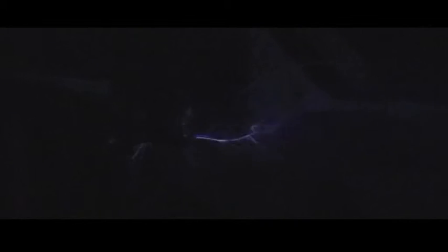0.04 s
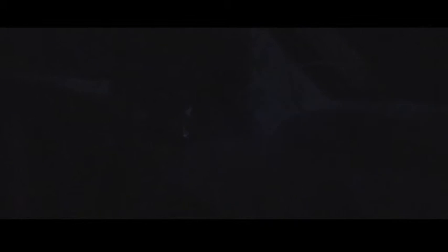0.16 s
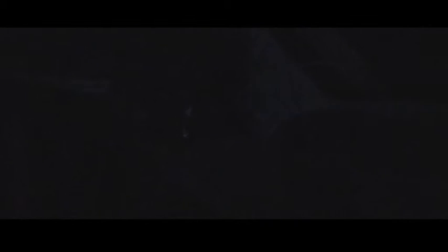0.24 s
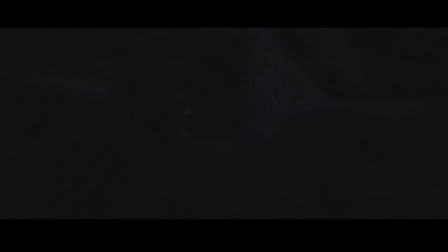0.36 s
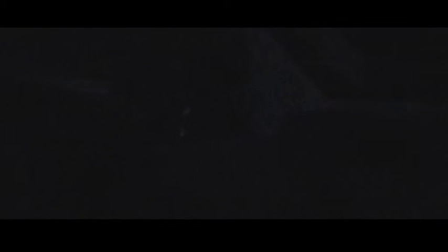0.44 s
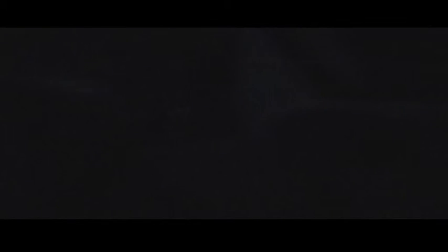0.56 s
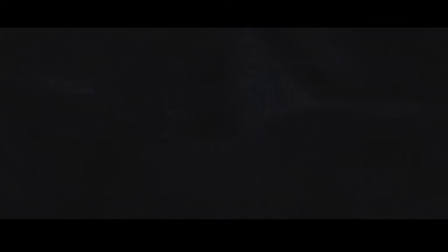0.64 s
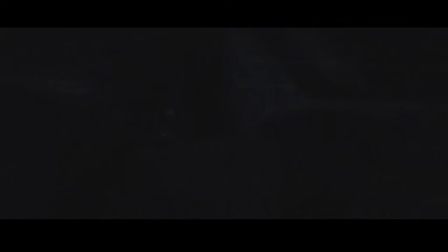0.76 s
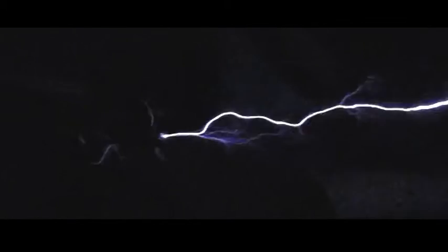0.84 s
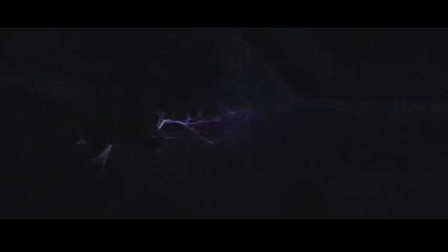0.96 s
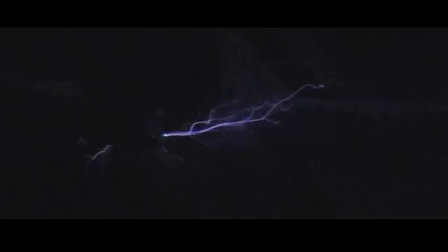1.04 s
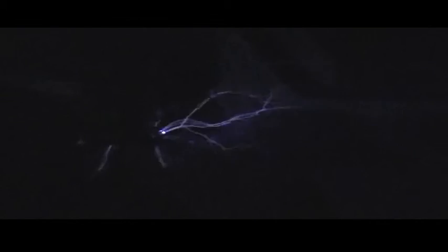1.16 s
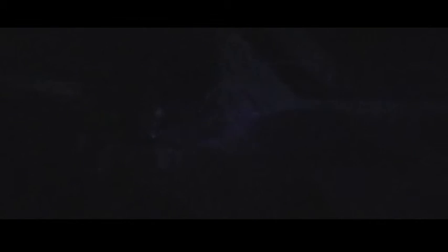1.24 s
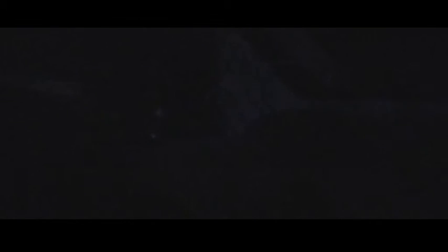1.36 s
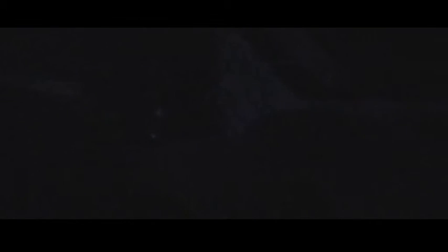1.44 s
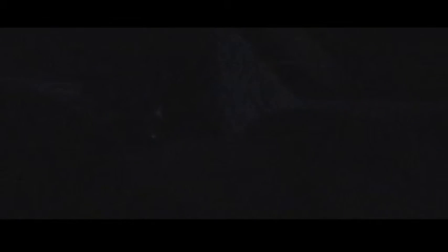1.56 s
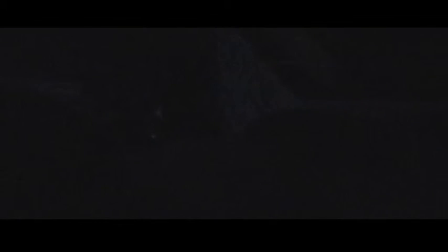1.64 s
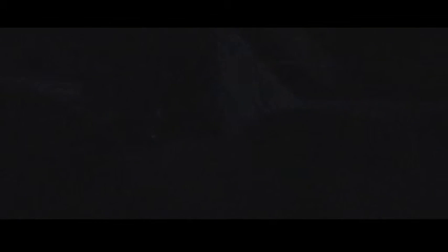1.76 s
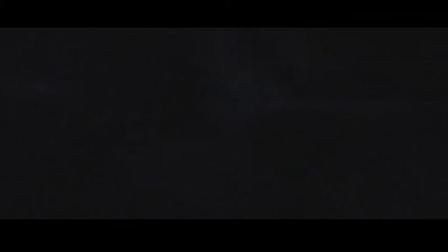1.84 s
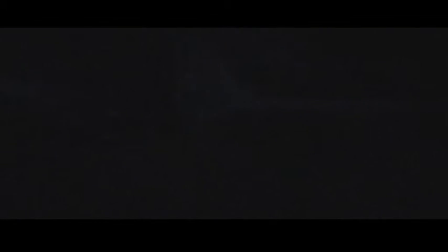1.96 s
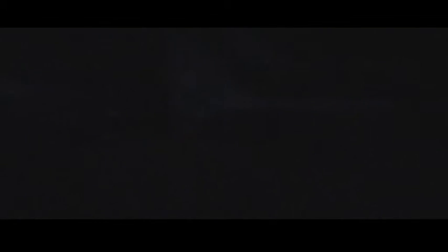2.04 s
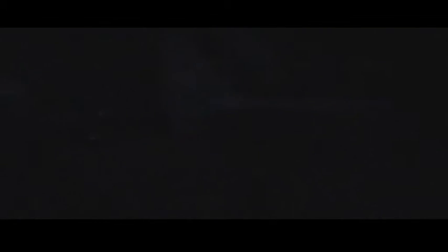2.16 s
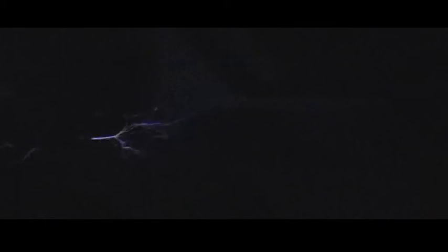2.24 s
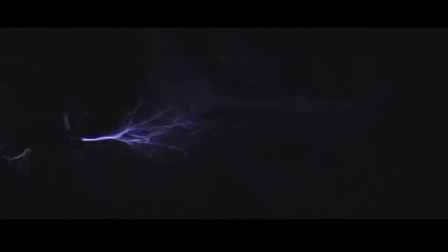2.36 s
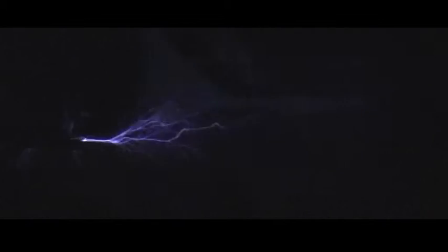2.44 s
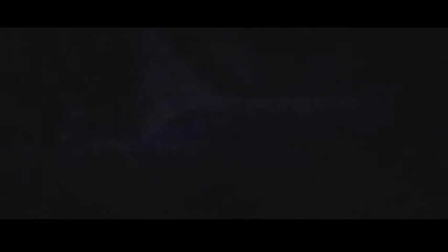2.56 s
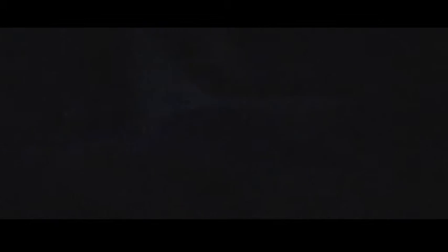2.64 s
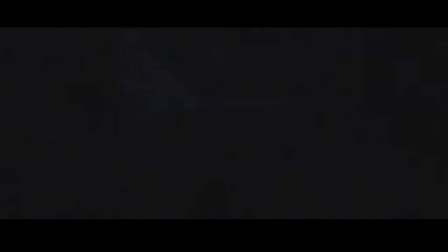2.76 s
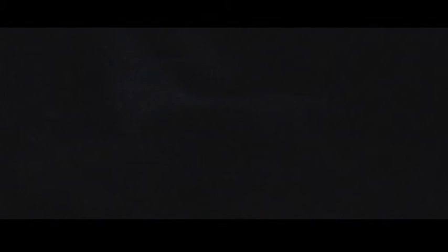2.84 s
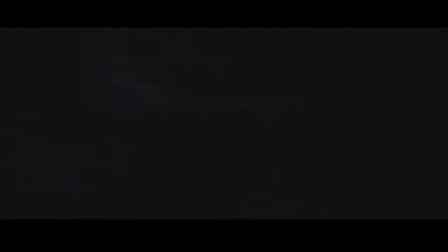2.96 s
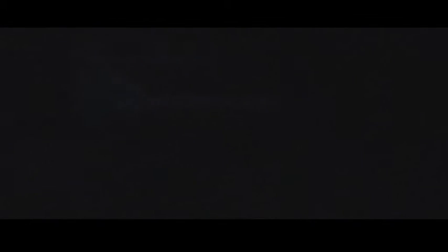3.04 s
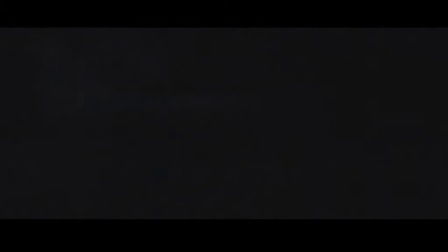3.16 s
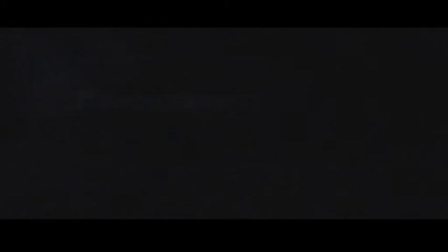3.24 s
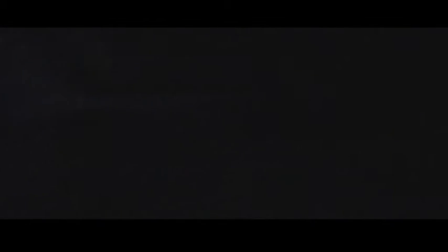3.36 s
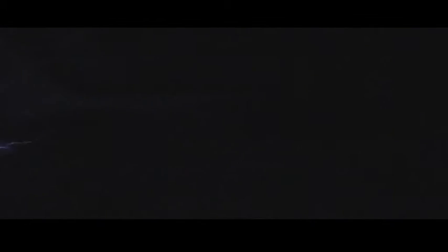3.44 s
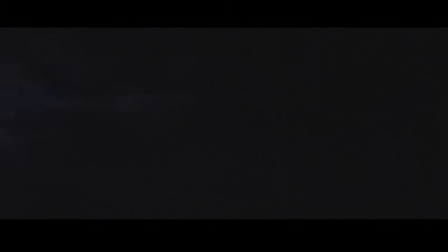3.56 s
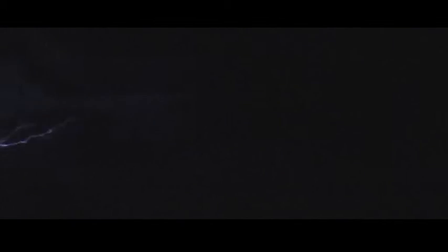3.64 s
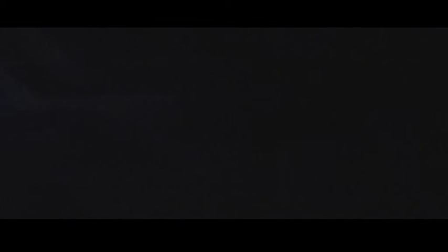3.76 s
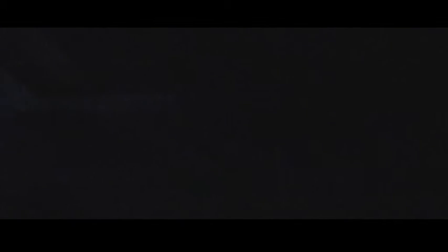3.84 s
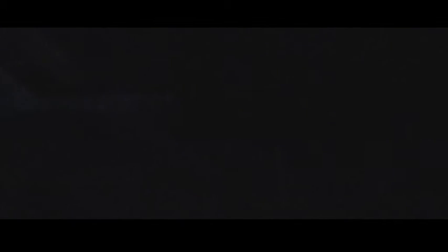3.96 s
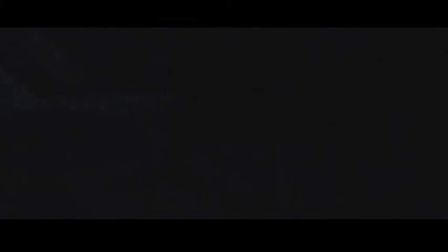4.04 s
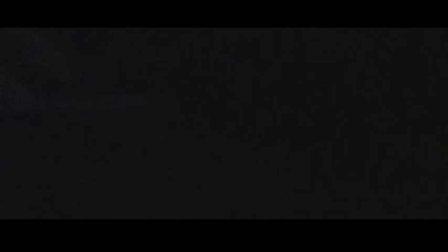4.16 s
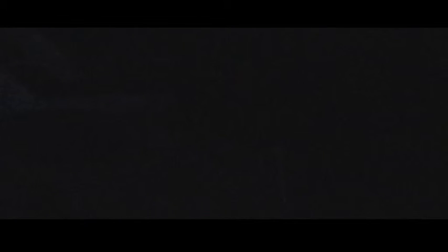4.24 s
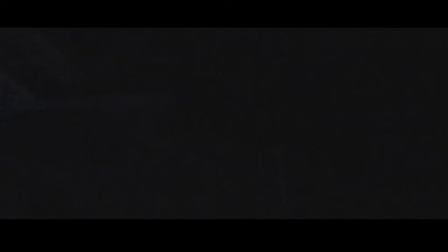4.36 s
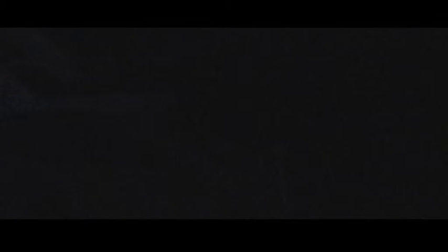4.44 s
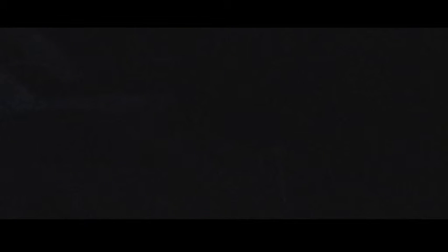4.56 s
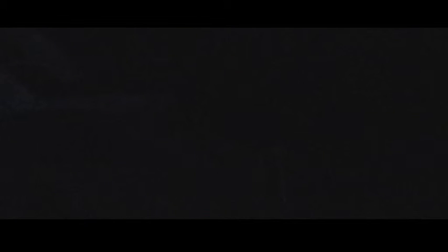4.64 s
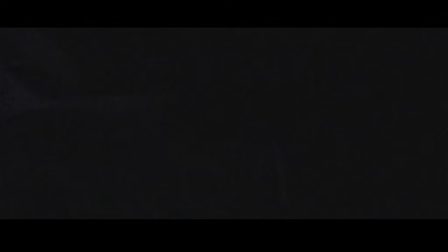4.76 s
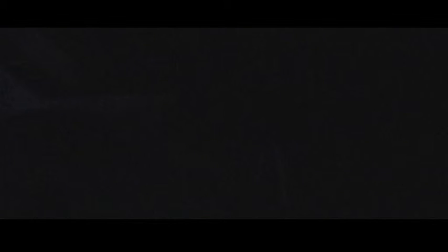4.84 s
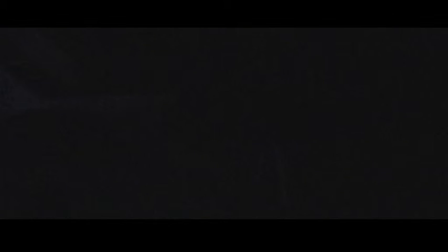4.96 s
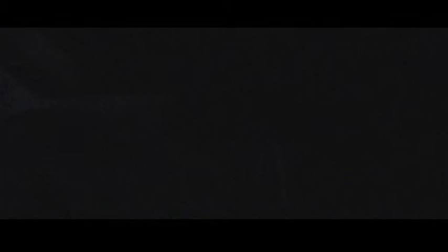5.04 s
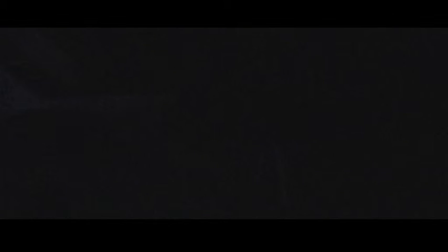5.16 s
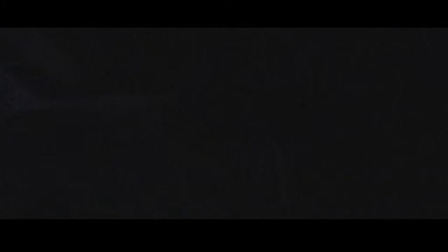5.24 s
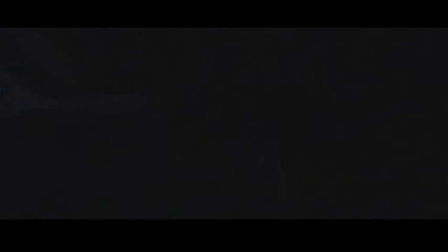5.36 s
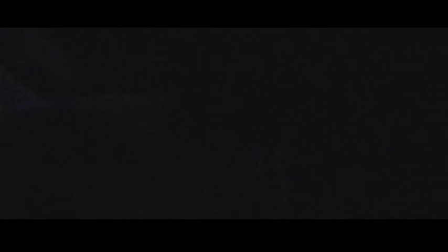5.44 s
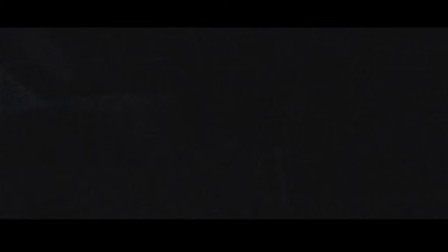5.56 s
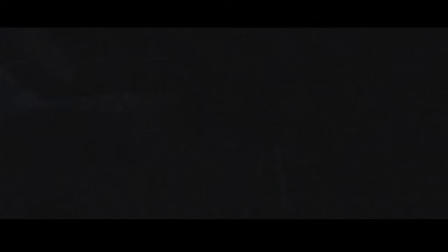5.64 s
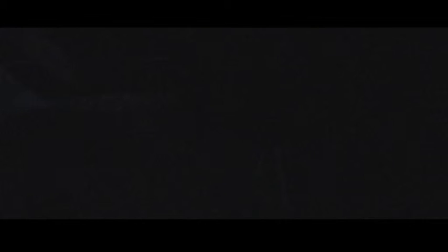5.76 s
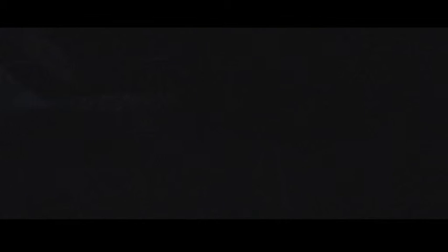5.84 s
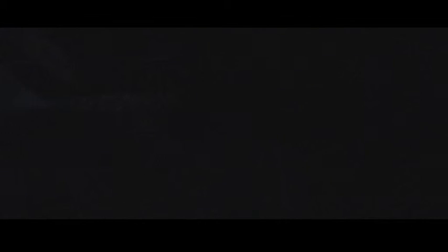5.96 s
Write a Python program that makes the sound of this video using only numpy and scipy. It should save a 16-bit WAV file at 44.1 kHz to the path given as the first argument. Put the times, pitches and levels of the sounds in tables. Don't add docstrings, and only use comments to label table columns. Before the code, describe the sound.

A contactor clacks and a spark coil rasps loudly, stopping and restarting in an echoing workshop, before quiet wooden knocks and a click.

```python
import sys
import numpy as np
from scipy import signal
from scipy.io import wavfile
from scipy.ndimage import uniform_filter1d

SR = 44100
rng = np.random.default_rng(int(sys.argv[2]) if len(sys.argv) > 2 else 0)


def decibels_to_gain(level_db):
    exponent = np.asarray(level_db, float) / 20
    return 10 ** exponent


def unload_audio(sound):
    columns = np.transpose(np.atleast_2d(sound))
    steps = np.round(np.clip(columns, -1, 1) * 32767)
    wavfile.write(sys.argv[1], SR, steps.astype(np.int16))


N = 264585
LEAD = 3 * SR // 10
DUCK_DB = -16.5


def evened(x):
    return x / np.sqrt(np.mean(x ** 2) + 1e-20)


def read(points, hz):
    f, value = np.transpose(points)
    return np.interp(np.log(hz + 1), np.log(f + 1), value)


def add(mix, start_s, sound):
    part = mix[round(start_s * SR):][:len(sound)]
    part += sound[:len(part)]


# frequency in Hz, difference in dB.
PORT_LEAN = [(60, -19.5), (180, -12), (550, -6), (1650, -3.5), (4970, -3.5), (15000, -5)]


def causal(points, lean=0):
    hz = abs(np.fft.fftfreq(4096, 1 / SR))
    log_gain = np.log(decibels_to_gain(np.maximum(read(points, hz), -100)))
    log_energy = np.log(np.mean(np.exp(2 * log_gain)))
    log_gain += np.log(decibels_to_gain(lean * read(PORT_LEAN, hz))) - log_energy / 2
    pulse = np.fft.ifft(np.exp(np.conj(signal.hilbert(log_gain)))).real
    return pulse[:2048] * np.hanning(4096)[2048:]


def dying_noise(t60_s, rise_s):
    t = np.arange(round(.4 * SR)) / SR
    decay = decibels_to_gain(-60 * t / max(t60_s, .002))
    return rng.standard_normal(len(t)) * decay * np.minimum(t / max(rise_s, 1e-4), 1)


# frequency in Hz, density in dB per Hz.
AIR_SPECTRUM = [(25, -42), (60, -21.5), (110, -9.5), (155, -0.5), (200, -14.5), (260, -1.5), (340, -17),
                (470, -11), (620, -19), (830, -13.5), (1650, -21), (3200, -23.5), (5000, -30),
                (16000, -35.5)]
# frequency in Hz, correlation.
AIR_LIKENESS = [(60, 0.92), (180, 1), (550, 0.93), (1650, 0.9), (4970, 0.41), (15000, 0.19)]
# time in seconds, level in dB.
RUMBLE_SWELL = [(0, 1), (.7, -0.5), (1.749, 3), (2.201, -0.5), (3.299, -2), (4.3, -2.5), (4.9, 2),
                (5.3, -3), (6, 1.5)]
# frequency in Hz, level in dB rms.
CAMERA_WHINE = [(5701, -76), (6300, -85), (9900, -78.5), (11698, -88.5), (12301, -89), (14853, -82.5),
                (15149, -90.5), (15299, -85), (15450, -87.5)]


def room_noise():
    frames, hz, t = N // 512 + 5, np.fft.rfftfreq(2048, 1 / SR), np.arange(N) / SR
    a, b, c, d, patches = rng.standard_normal((frames, 1025, 5)).T
    patches = uniform_filter1d(patches, size=16, axis=0)
    patches = evened(uniform_filter1d(patches, size=7, axis=1))
    swell_db = np.interp(np.arange(frames) * 512 / SR, *np.transpose(RUMBLE_SWELL))
    drift_db = swell_db / (1 + (hz[:, None] / 1500) ** 2)
    patch_db = (0.3 + 1.6 / (1 + (hz[:, None] / 1200) ** 2)) * patches

    same = np.clip(read(AIR_LIKENESS, hz), -1, 1)[:, None]
    left = a + 1j * b
    right = same * left + np.sqrt(1 - same ** 2) * (c + 1j * d)
    z = np.array([left, right]) * decibels_to_gain(read(AIR_SPECTRUM, hz)[:, None] + patch_db + drift_db)
    air = decibels_to_gain(-51.5) * evened(signal.istft(z, nperseg=2048, noverlap=1536)[1][:, :N])
    whine = sum(decibels_to_gain(db + 1.0) * np.sin(2 * np.pi * (f * t + rng.random())) for f, db in CAMERA_WHINE)
    return air + whine


# frequency in Hz, t60 in seconds.
WALL_T60 = [(150, .25), (450, 2.3), (1000, 1.26), (2000, 0.92), (3500, 0.78), (6000, 0.62), (10000, 0.39),
            (15000, 0.47)]
# frequency in Hz, level in dB.
WALL_LEVEL = [(150, -38.5), (450, -23), (1000, -13.5), (2000, 1), (3500, 0.5), (6000, 2), (10000, -4.5),
              (15000, -7.5)]
# frequency in Hz, level in dB.
BENCH_ECHO = [(150, -38.5), (600, -30), (1500, -28.5), (3000, -25), (6000, -22.5), (10500, -26),
              (15000, -28.5)]


def workshop(x):
    length, first_echo_samples, turns_hz = 3 * SR // 2, 60, 48.0
    noise = rng.standard_normal((3, 2, length)) * (np.arange(length) > first_echo_samples)
    hz, t, z = signal.stft(noise, SR, nperseg=256)
    z[:, 1] = 0.69 * z[:, 0] + 0.18 * z[:, 1]
    t60_s = np.maximum(read(WALL_T60, hz), .03)[:, None]
    late = decibels_to_gain(read(WALL_LEVEL, hz)[:, None] - 60 * t / t60_s) / np.sqrt(t60_s * 4500)
    early = decibels_to_gain(read(BENCH_ECHO, hz)[:, None] - 60 * t / 0.09)
    tails = signal.istft(z * (late + early), SR, nperseg=256)[1]
    turn = 2 * np.pi * (np.arange(x.shape[1]) / SR * turns_hz + np.arange(3)[:, None, None] / 3)
    shares = x * np.sqrt((1 + np.cos(turn)) / 3)
    return signal.fftconvolve(shares, tails, axes=2).sum(0)[:, :x.shape[1]]


# start in seconds, peak in dB, t60 in seconds, top frequency in Hz.
BENCH_KNOCKS = [
    (4.601, -38.5, 0.49, 2540),
    (4.945, -41, 0.059, 2980),
    (4.97, -43, 0.066, 2200),
    (5.032, -24, 0.24, 1300),
    (5.096, -57.5, 0.17, 1200),
    (5.492, -45, 0.11, 700),
    (5.715, -25.5, 0.27, 2120),
    (5.922, -32.5, 0.14, 6000),
    (5.943, -25.5, 0.037, 2980),
]
# frequency in Hz, width in Hz, gain in dB.
BENCH_MODES = [(249, 50, -1.5), (469, 110, -1.5), (754, 123, 2), (970, 60, -6), (1320, 140, -6.5),
               (1630, 56, -11), (2230, 77, -16)]
# start in seconds, peak in dB, t60 in seconds.
BUTTON_TICKS = [
    (5.106, -57, .02),
    (5.926, -48, 0.0072),
    (5.9415, -31, 0.0055),
]
# frequency in Hz, density in dB per Hz.
TICK_SPECTRUM = [(1200, -37), (2000, -13), (4650, 1), (6900, 0), (11500, -5), (13300, -24), (14800, -1),
                 (16000, -12)]


def knocks():
    out = np.zeros(N)
    for start_s, peak_db, t60_s, top_hz in BENCH_KNOCKS:
        blow = dying_noise(t60_s, 0.00018) + 1.93 * dying_noise(0.019, 0.00018)
        push = signal.lfilter(*signal.butter(4, min(top_hz, 15000), fs=SR), blow)
        body = 0
        for hz, width_hz, gain_db in BENCH_MODES:
            peak = signal.iirpeak(hz, hz / max(width_hz, 30), SR)
            body = body + decibels_to_gain(gain_db) * signal.lfilter(*peak, push)
        add(out, start_s, decibels_to_gain(peak_db) * body / abs(body).max())
    for start_s, peak_db, t60_s in BUTTON_TICKS:
        tick = signal.fftconvolve(dying_noise(t60_s, 0.00029), causal(TICK_SPECTRUM))
        add(out, start_s, decibels_to_gain(peak_db + 9.0) * tick)
    return out


# start in seconds, peak in dB, housing ring in dB, rise in seconds,
# t60 of the rattle in seconds.
CONTACTOR_BLOWS = [
    (0.167, -31, 3.5, 0.0016, 0.2),
    (0.788, -10.5, -4, 0.0041, 0.083),
    (1.591, -12.5, -7, .003, 0.19),
    (2.187, -6.5, -4.5, 0.0056, 0.061),
    (2.665, -25, -4, 0.0025, 0.26),
    (3.398, -7.5, -5, .004, 0.042),
    (3.881, -18.5, -8, .0015, 0.12),
    (3.912, -33, 7.5, 0.0037, 0.3),
]
# frequency in Hz, density in dB per Hz.
CLACK_SPECTRUM = [(100, -51), (250, -36), (500, -30.5), (1300, -3), (2000, -10), (2900, -3.5), (5000, -9.5),
                  (8000, -5.5), (12000, -10.5), (16000, -17.5)]
# frequency in Hz, level in dB, t60 in seconds.
HOUSING_MODES = [(356, -7.5, 0.049), (397, -10, 0.022), (468, 3.5, 0.08), (501, -5.5, 0.09),
                 (1320, -13.5, 0.03), (1687, -15, 0.023), (2840, -0.5, 0.019), (3200, -13, 0.02)]


def contactor():
    out, blows, t = np.zeros(N), np.zeros(N), np.arange(4000) / SR
    modes = np.array([decibels_to_gain(db - 60 * t / t60_s) * np.sin(2 * np.pi * hz * t) for hz, db, t60_s in HOUSING_MODES])
    heavy = np.transpose(HOUSING_MODES)[0] < 600
    heavy_ring, bright_ring = modes[heavy].sum(0), modes[~heavy].sum(0)
    snap = causal(CLACK_SPECTRUM)
    for start_s, db, ring_db, rise_s, t60_s in CONTACTOR_BLOWS:
        rattle = dying_noise(t60_s, rise_s)
        rattle *= np.minimum(np.arange(len(rattle)) / SR / max(rise_s, 1e-4), 1)
        seat = np.r_[6., .7 * rattle]
        thud = signal.fftconvolve(seat, heavy_ring)
        ping = signal.fftconvolve(seat, bright_ring)
        add(out, start_s, decibels_to_gain(db - 1) * signal.fftconvolve(rattle, snap))
        add(out, start_s + 1.6 * rise_s, decibels_to_gain(db + ring_db - 26.5) * thud)
        add(out, start_s + .45 * rise_s, decibels_to_gain(db + ring_db / 2 - 20) * ping)
        add(blows, start_s + rise_s, decibels_to_gain(db + 14.5) * snap)
    return signal.sosfilt(signal.butter(2, 200, "high", fs=SR, output="sos"), out), blows


def streamer(heat, length):
    t, push_s = np.arange(120) / SR, .00006
    back_s = 0.00024 + 0.00055 * length
    push = 0.28 * np.exp(-((t - 2 * push_s) / push_s) ** 2)
    suction = 0.56 * .25 * np.exp(-((t - back_s) / .0001) ** 2)
    shared, own = rng.standard_normal(len(t) + 1), rng.standard_normal((2, len(t) + 1))
    branches = signal.lfilter([1, -.8], 1, 0.38 * shared + 0.2 * own)[:, 1:]
    return heat * push - heat * suction + branches * np.exp(-t / 0.00052)


# first spark in seconds, last spark in seconds.
COIL_BURSTS = [
    (-.25, .043),
    (.8145, 1.243),
    (2.2142, 2.526),
    (3.4245, 3.689),
]
# level at switch-on in dB, fading as the gap warms in dB per second,
# switch-on row against the rest in dB.
BURST_STRENGTH = [
    (-16, -16, -8.5),
    (-16, -8.5, 1.5),
    (-15, -13, -3),
    (-15, -18.5, -4.5),
]
# start in seconds, end in seconds.
GAP_STALLS = [
    (1.094, 1.115),
    (3.506, 3.526),
]
FIRING_SAG_DB = [3, 1.5, -1, -3]


def sparks():
    half_wave_s, fire_at_s = .01, .0067
    wait_s = np.array([.0002, .0016, .0018, .0015])
    wait_spread_s = np.array([.002, .0017, .001, .001])
    falter_s, falter_db = 0.021, -2.5
    inrush_fall_db_per_s, inrush_push = 700, 0.66

    starts_s = np.arange(-26, N // 441) * half_wave_s + fire_at_s
    draw = rng.random((len(starts_s), 2, 4))
    waits_s = wait_s + wait_spread_s * draw[:, 0]
    s = (starts_s[:, None] + np.cumsum(waits_s, axis=1)).ravel()
    fires = (draw[:, 1] < [1, .9, .5, .1]).ravel()
    sag_db = np.tile(FIRING_SAG_DB, len(starts_s)) * 1.
    for a, b in GAP_STALLS:
        fires &= (s < a) | (s > b)
        sag_db += falter_db * np.clip(1 - (a - s) / falter_s, 0, 1) * (s < a)

    out = np.zeros((2, LEAD + N))
    for (first, last), (start_db, fade_db_per_s, boost_db) in zip(COIL_BURSTS, BURST_STRENGTH):
        inrush = first + np.arange(9) * 0.0011 + 0.00091 * np.r_[0, rng.random(8)]
        inrush_db = boost_db - inrush_fall_db_per_s * (inrush - first)
        running = fires & (s > first + .011) & (s < last)
        times = np.r_[s[running], inrush]
        level_db = start_db + fade_db_per_s * (times - first) + np.r_[sag_db[running], inrush_db] + 11.5
        heats = np.r_[np.ones(running.sum()), inrush_push * np.ones(len(inrush))]
        for at, db, heat in zip(times, level_db, heats):
            size, side = rng.standard_normal(2)
            shock = streamer(heat, rng.random())
            for port, sign in enumerate((1, -1)):
                delay_s = sign * (.000007 * side - .000006)
                port_db = db - DUCK_DB + 2.24 * size + 0.91 * sign * side
                add(out[port], at + LEAD / SR + delay_s, decibels_to_gain(port_db) * shock[port])
    return out


def ducking():
    react_s, fall_s, hold_s, recover_s = .0075, 0.0011, .32, .235
    corners = []
    for first, last in COIL_BURSTS:
        corners += [(first + react_s, 0), (first + react_s + fall_s, DUCK_DB)]
        corners += [(last + hold_s, DUCK_DB), (last + hold_s + recover_s, 0)]
    return decibels_to_gain(np.interp(np.arange(N) / SR, *np.transpose(corners)))


# frequency in Hz, density in dB per Hz.
SPARK_SPECTRUM = [(30, -48.5), (60, -8.5), (100, -10.5), (200, -5), (450, -3.5), (750, -8.5), (1200, -11.5),
                  (1800, -12.5), (2900, -10), (4300, -14), (7000, -13), (10500, -5.5), (13000, -9),
                  (16000, -20.5)]


def scene():
    ports = [causal(SPARK_SPECTRUM, 0.25), causal(SPARK_SPECTRUM, -0.74)]
    coil = signal.oaconvolve(sparks(), ports, axes=1)[:, :LEAD + N]
    rattles, blows = contactor()
    bench = knocks()
    echoes = workshop(coil + np.pad(blows + 0.27 * bench, (LEAD, 0)))
    near = rattles * decibels_to_gain([[-1.5], [1.5]]) + bench * decibels_to_gain([[-.3], [.3]])
    return (coil + echoes)[:, LEAD:] + near + room_noise()


def roll_off(x):
    return signal.sosfilt(signal.butter(12, 16450, fs=SR, output="sos"), x)


def record(dry):
    t = np.arange(N) / SR
    hum = decibels_to_gain(-74 - 0.5 * t) * np.sin(2 * np.pi * 99 * t)
    loaded = np.clip(dry * ducking() + hum, -1, 1)
    band = signal.sosfilt(signal.butter(2, 70, "high", fs=SR, output="sos"), loaded)
    low_pass = signal.firwin(255, 15900, window=("kaiser", 8), fs=SR)
    edged = signal.oaconvolve(band, low_pass[None], "same")
    return roll_off(np.clip(edged, -1, 1))


dry = scene()
out = record(dry)
unload_audio(out)
```